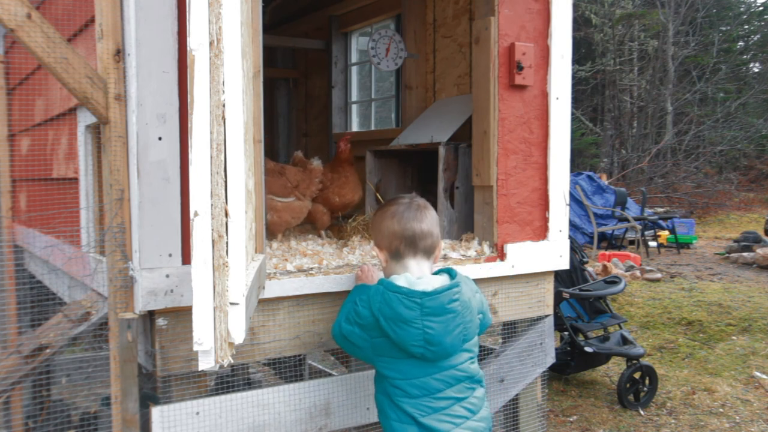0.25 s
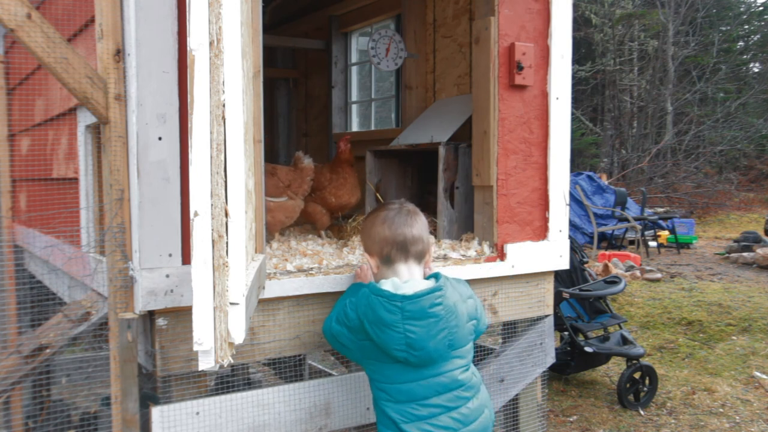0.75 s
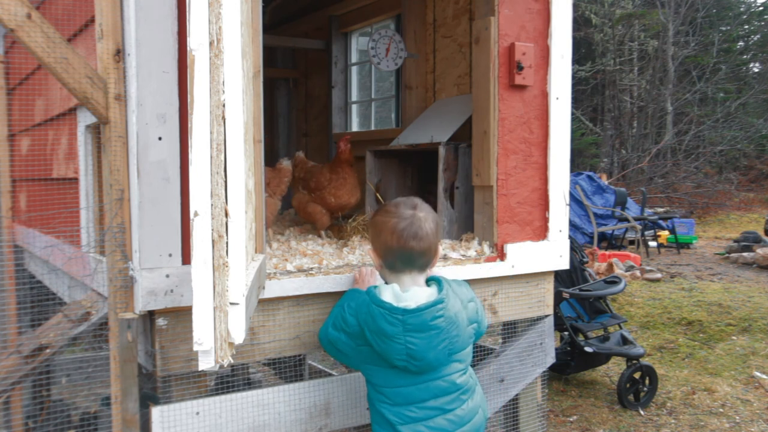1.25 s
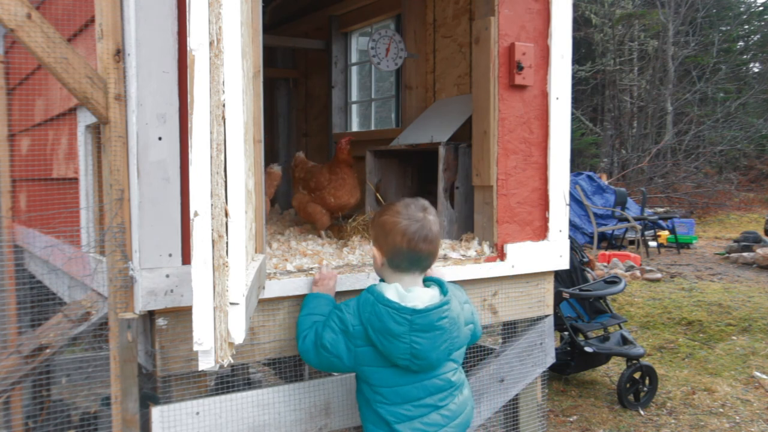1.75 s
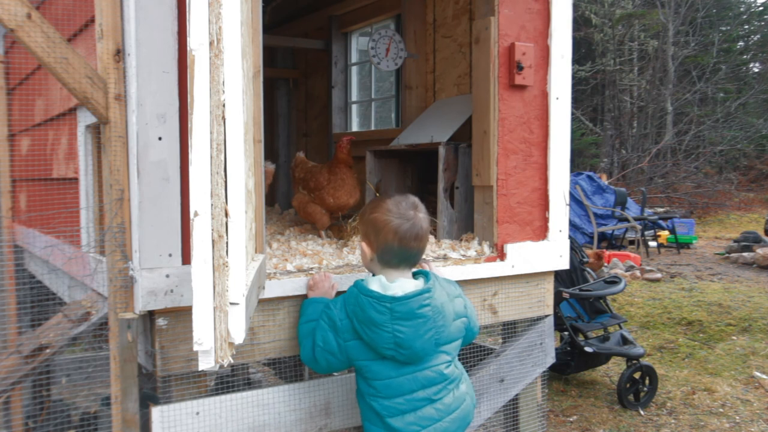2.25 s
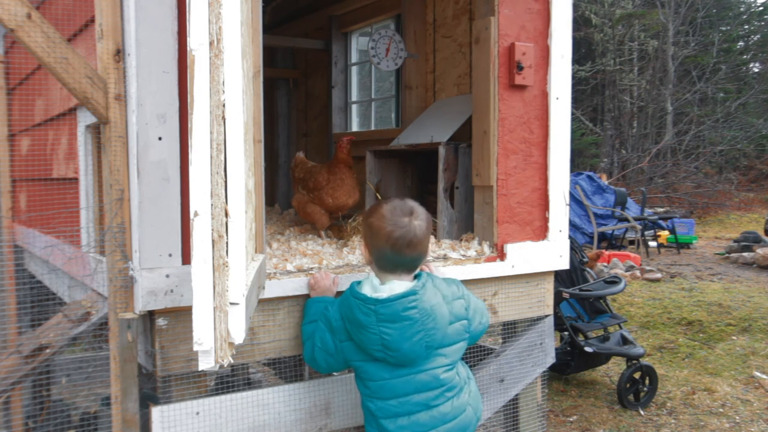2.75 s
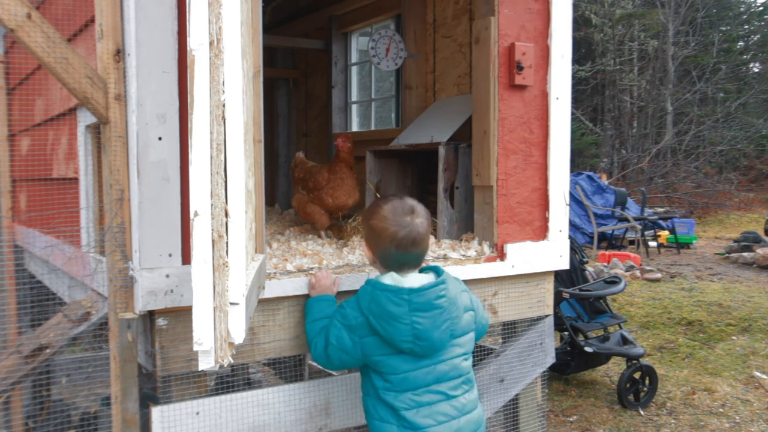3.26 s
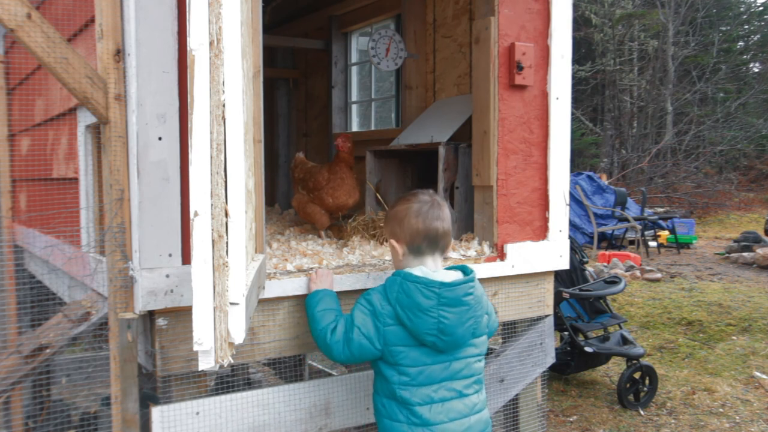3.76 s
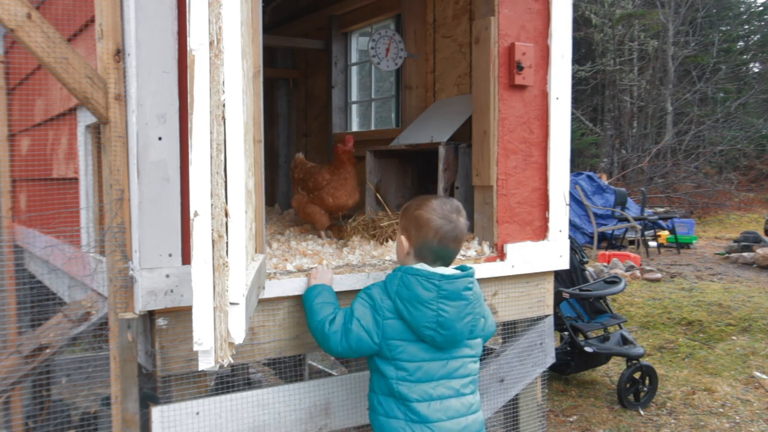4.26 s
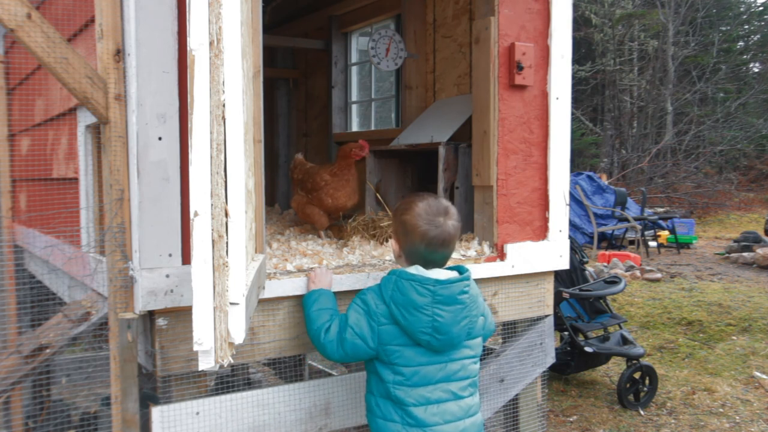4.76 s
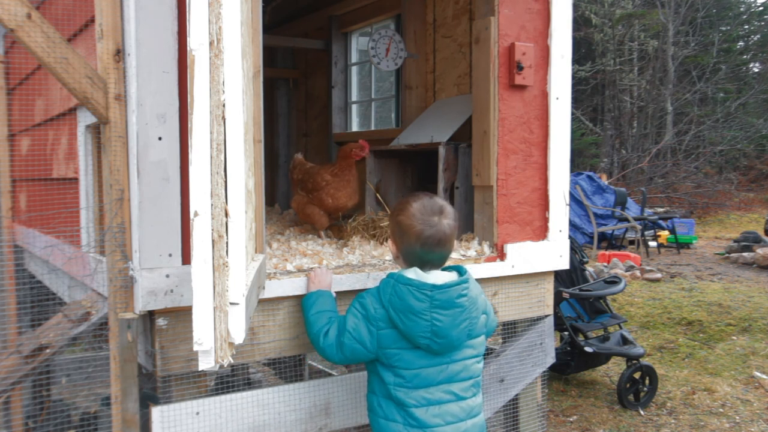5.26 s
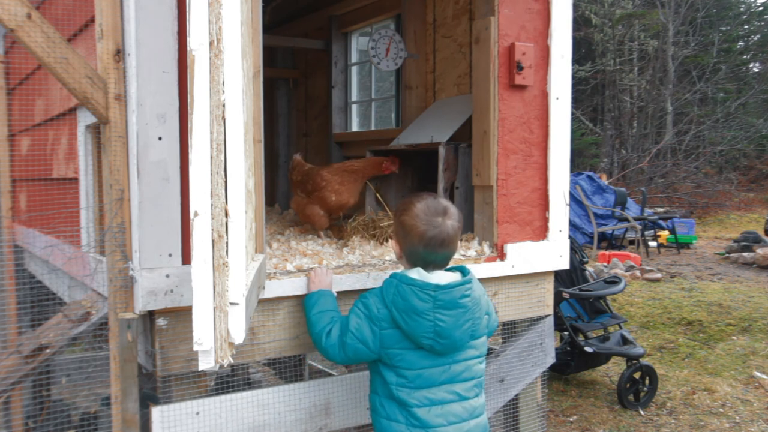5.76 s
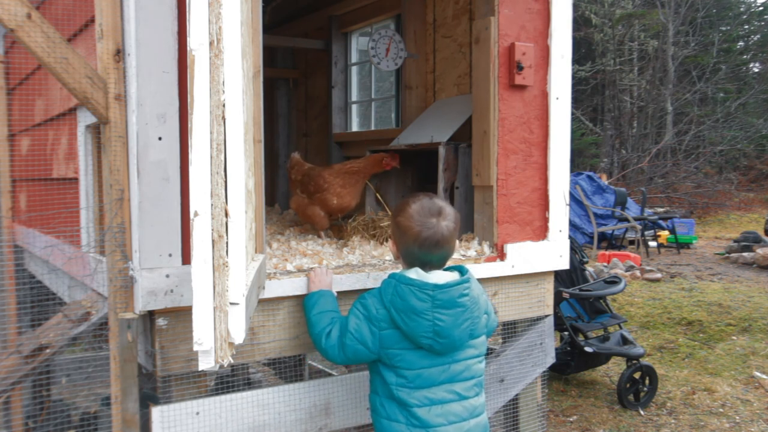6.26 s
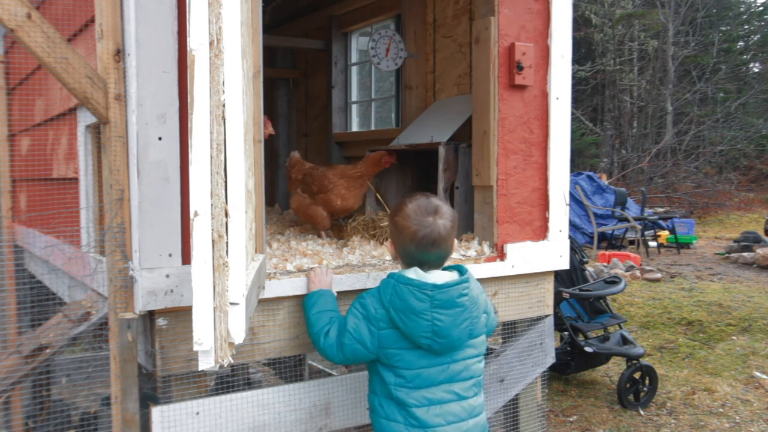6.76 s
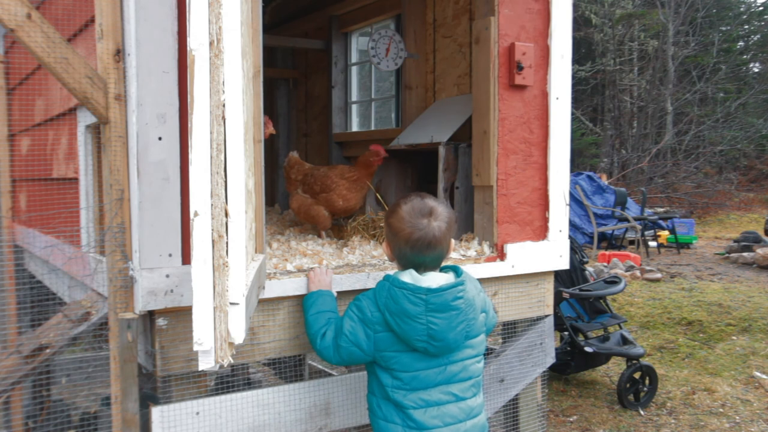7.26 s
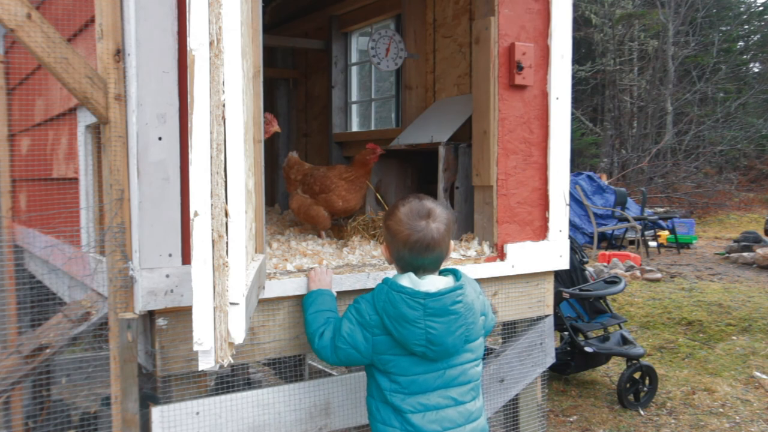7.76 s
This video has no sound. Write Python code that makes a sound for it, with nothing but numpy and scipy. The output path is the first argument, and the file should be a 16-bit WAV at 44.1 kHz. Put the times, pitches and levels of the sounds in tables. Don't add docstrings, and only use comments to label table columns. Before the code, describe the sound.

Contented clucking, rough squawks and low grumbles from hens in a backyard coop, claws scuffling litter on boards, faint wind and trees behind.

```python
import sys
import numpy as np
from scipy import signal
from scipy.fft import rfft, irfft
from scipy.io import wavfile
from scipy.ndimage import uniform_filter1d, minimum_filter1d

SR = 44100
rng = np.random.default_rng(int(sys.argv[2]) if len(sys.argv) > 2 else 0)


def to_linear_factor(level_db):
    exponent = np.asarray(level_db, float) / 20
    return 10 ** exponent


def wav_out(sig):
    wavfile.write(sys.argv[1], SR, np.round(np.clip(np.atleast_2d(sig).T, -1, 1) * 32767).astype(np.int16))


N = 353241
GATE_DEPTH_DB = 9.5

# resonance_hz, width_hz, level_db
SHUT_THROAT = [(480, 390, -14.5), (982, 445, 3.5), (1330, 480, -8), (1842, 258, 4.5), (2780, 600, -6.5),
               (4080, 950, -14.5), (7600, 10000, -38), (14000, 2400, -40.5)]
OPEN_THROAT = [(687, 316, -4), (1028, 320, 3.5), (1273, 296, 4), (2195, 520, -6), (3855, 970, -16),
               (5620, 1010, -19), (7740, 1020, -21.5), (9930, 1600, -30), (12360, 1900, -30.5),
               (15700, 2100, -38.5)]


def resonate(x, modes):
    out = 0
    for k, (hz, width_hz, db) in enumerate(modes):
        pole = signal.tf2sos(*signal.iirpeak(hz, hz / width_hz, SR))
        out = out + (-1) ** k * to_linear_factor(db) * signal.sosfilt(np.vstack([pole, pole]), x)
    return out


def coloured(x, curve):
    hz, db = np.transpose(curve)
    bins_hz = np.arange(N // 2 + 1) * SR / N
    gain = to_linear_factor(np.interp(np.log(bins_hz + 1), np.log(hz), db))
    y = irfft(rfft(x) * gain, N)
    return y / y.std()


def wobble(n, hz):
    w = signal.lfilter(*signal.butter(2, hz, fs=SR), rng.standard_normal(n + 2000))[2000:]
    return w / w.std()


def add(track, s, x):
    i = int(s * SR)
    track[i:i + len(x)] += x[:N - i]


def syrinx(hz, rough, half):
    jitter, shimmer, spread, breath = 0.0632, 0.74, .045, .8
    rough, half, n = np.clip(rough, 0, 1), np.clip(half, 0, 1), len(hz)
    phase = np.pi * np.cumsum(hz * (1 + jitter * rough * wobble(n, 260))) / SR
    k = np.arange(1, int(.74 * SR / hz.max()))[:, None]
    lines = np.where(k % 2, half, 1) * np.cos(k * phase - spread * k ** 2)
    pulses = lines.sum(0) * (1 + shimmer * rough * wobble(n, 150))
    hiss = rng.standard_normal(n) * (1 + np.cos(2 * phase)) * np.sqrt(len(k) / 6)
    return np.sqrt(hz / 400) * ((1 - 0.81 * rough) * pulses + breath * rough ** 0.74 * hiss)


def open_beak(t, hz, db, bright, rough, half, throat):
    notch_hz, notch_width_hz = 2825, 290
    voice = signal.lfilter(*signal.iirnotch(notch_hz, notch_hz / notch_width_hz, SR), syrinx(hz, rough, half))
    low, high = resonate(voice, throat[:4]), resonate(voice, throat[4:])
    edge = np.clip(np.minimum(t - t[0], t[-1] - t) / 0.005, 0, 1)
    level = to_linear_factor(db) / np.sqrt(uniform_filter1d(low ** 2, 900))
    return (low + to_linear_factor(bright + 14) * high) * edge * level


def garden_air():
    # frequency_hz, level_db
    air_curve = [(18, -50), (30, -33), (194, 5.5), (1200, 3), (1630, 2.5), (3580, -5), (5310, -6),
                 (7870, -10.5), (8740, -13.5), (10500, -12), (16000, -20)]
    air_db = -58.5
    return coloured(rng.standard_normal(N), air_curve) * to_linear_factor(air_db + GATE_DEPTH_DB + 0.8 * wobble(N, 2.9))


def earlier_squawk():
    # level_db, t60_s, pitch_hz, line_width_hz, haze_between_lines_db
    db, t60, hz, width, haze_db = (-34.5, 1, 327.5, 25.5, -10)
    noise = signal.lfilter([1, -.9], [1], rng.standard_normal(N))
    lines = resonate(noise, [(k * hz, width, 0) for k in range(1, 14)])
    tail = resonate(lines + to_linear_factor(haze_db) * noise, OPEN_THROAT[:5])
    return tail / tail.std() * to_linear_factor(db - 60 * np.arange(N) / SR / t60)


def steps():
    # start_s, peak_db, board_hz, push_s, scratch_db
    footfalls = [(0.413, -40, 200, 0.012, -18), (.85, -36, 540, .008, -18), (.872, -32, 393, .01, -23),
                 (2.971, -24, 500, 0.013, -13), (3.01, -28.5, 303, .015, -20),
                 (3.05, -29.5, 564, 0.013, -18.5), (3.245, -28, 258, 0.0064, -7.5),
                 (4.289, -28, 210, 0.013, -26.5), (4.7, -31, 242, .014, -24),
                 (5.032, -29.5, 480, 0.015, -29), (5.059, -27.5, 235, 0.012, -20.5),
                 (5.337, -22.5, 220, 0.011, -34), (5.44, -24.5, 290, 0.0064, -31),
                 (5.63, -32, 271, 0.023, -35), (6.47, -28.5, 332, 0.0054, -22.5),
                 (6.557, -26, 510, 0.0055, -36), (6.575, -32.5, 177, 0.018, -22),
                 (6.754, -32.5, 310, 0.0022, -22), (7.968, -45, 224, 0.011, -21)]
    # ratio_to_board_pitch, level_db
    board_modes = [(.55, -7), (0.999, 5.5), (1.7, -14.5), (2.6, -9), (4.199, -15.5)]
    damping = 0.43
    out, t = np.zeros(N), np.arange(SR // 4) / SR
    for s, db, hz, push_s, scratch_db in footfalls:
        push = t / push_s * np.exp(-t / push_s)
        modes = [(hz * ratio, damping * hz * ratio, gain_db) for ratio, gain_db in board_modes]
        boards = resonate(rng.standard_normal(len(t)) * push, modes)
        claw = signal.lfilter([1, -1], [1, -.6], rng.standard_normal(len(t))) * np.exp(-t / (1.1 * push_s))
        thump = boards / np.abs(boards).max() + 0.24 * to_linear_factor(scratch_db) * claw
        add(out, s - .4 * push_s, to_linear_factor(db + 1.0) * thump)
    return out


def coo():
    # centre_s, peak_db, width_s
    swells = [
        (1.01, -50, .06),
        (1.11, -34.5, .045),
        (1.235, -34, .048),
    ]
    start_s, length_s, high_hz, low_hz, sink_s = .98, .36, 545, 384, .105
    t = np.arange(0, length_s, 1 / SR)
    hz = low_hz + (high_hz - low_hz) * np.exp(-t / sink_s)
    phase = 2 * np.pi * np.cumsum(hz) / SR
    swell = sum(to_linear_factor(db) * np.exp(-((t + start_s - s) / width) ** 2) for s, db, width in swells)
    out = np.zeros(N)
    add(out, start_s, swell * (np.sin(phase) + to_linear_factor(-35) * np.sin(2 * phase)))
    return out


def cluck_run(rows, throat, length, hoarse, gain_db=-2, scoop=0.2517, half=0.39):
    out = np.zeros(N)
    u = np.arange(int(length * SR)) / (length * SR)
    swell = np.sin(np.pi * u ** 1.594)
    for s, db, hz, open_db in rows:
        pitch = hz / 2 * (1 - scoop * np.exp(-u / 0.1706) - 0.032 * u ** 3)
        voice = syrinx(pitch, hoarse * (1 + 1.95 * np.exp(-u / 0.31)), half * hoarse)
        low = resonate(np.pad(voice * swell ** .9, (0, 600)), throat[:3])
        high = resonate(np.pad(voice * swell ** 1.5, (0, 600)), throat[3:])
        voice = low - to_linear_factor(open_db + 5.5) * high
        add(out, s - 0.33 * length, voice * to_linear_factor(db + gain_db - 8.5) / voice.std())
    return out


def short_clucks():
    # start_s, peak_db, second_partial_hz, beak_opening_db
    rows = [
        (1.005, -10, 1020, -14),
        (1.225, -8.5, 1007, -12),
        (1.443, -8, 1009, -11),
        (1.919, -6, 1020, -15.5),
        (2.864, -11, 981, -15),
        (3.113, -10.5, 947, -11.5),
        (3.606, -9.5, 958.3, -10),
        (3.839, -9.5, 964, -8.5),
        (5.264, -12, 984, -14),
        (5.497, -10, 967.5, -11.5),
    ]
    return cluck_run(rows, SHUT_THROAT, length=.056, hoarse=.21)


def squawk(rows, half):
    treble_db, rough_lift_db, grow_db_per_s, shut_db, shut_s = -17.5, 8, 18, -12, 0.044
    s, *columns = np.transpose(rows)
    t = np.arange(s[0], s[-1], 1 / SR)
    hz, db, rough = (np.interp(t, s, c) for c in columns)
    shut = np.clip(1 - (s[-1] - t) / shut_s, 0, 1)
    bright = treble_db + rough_lift_db * rough + grow_db_per_s * (t - s[0]) + shut_db * shut
    bright = bright + 2.55 * wobble(len(t), 36)
    return open_beak(t, hz, db, bright, rough, half, OPEN_THROAT)


def squawks():
    # time_s, pitch_hz, level_db, roughness (0-1)
    first = [
        (1.572, 371.9, -10.5, 0.38),
        (1.68, 368, -13.5, 0.42),
        (1.695, 332.3, -12.5, .2),
        (1.731, 335.2, -16, 0.4),
        (1.809, 356.8, -25, 0.6),
    ]
    second = [
        (3.953, 300.8, -10, 0.93),
        (3.985, 313.5, -8, 0.077),
        (4.02, 322.3, -12, 0.013),
        (4.05, 318.6, -15.5, 0.35),
        (4.147, 339.3, -11.5, 0.48),
        (4.167, 326.3, -21, 0.72),
        (4.21, 336, -21.5, 0.4),
    ]
    third = [
        (6.09, 267.8, -15, 1),
        (6.122, 317.2, -9.5, .09),
        (6.165, 322.9, -11, 0.0089),
        (6.222, 326.6, -12, .02),
        (6.233, 324.5, -10, 0.6),
        (6.272, 305, -20.5, 1),
    ]
    half_shares = (0.23, 0.19, .02)
    out = np.zeros(N)
    for call, half in zip((first, second, third), half_shares):
        add(out, call[0][0], squawk(call, half))
    return out


def scuffle():
    # time_s, peak_db, rise_db_per_s, fade_db_per_s, dull_knock_share_db
    kick_rows = [(1.98, -38.5, 400, 57, -34), (2.3, -54.5, 190, 246, -4), (2.85, -41, 94, 160, -24),
                 (3.02, -42, 127, 62, 8.5), (3.246, -38, 2998, 63, -4), (4.72, -52.5, 500, 86, -0.5),
                 (4.9, -54, 200, 97, -19), (6.87, -44.5, 496, 86, -3), (7.22, -50, 153, 202, -8),
                 (5.344, -46.5, 3000, 30, 10.5), (5.486, -46, 300, 247, -16), (5.66, -62, 219, 60, 5.5)]
    # frequency_hz, level_db
    litter_curve = [(300, -17.5), (1000, -11), (2000, -4.5), (4000, -8), (7000, -12.5), (11000, -15),
                    (16000, -31.5)]
    knock_curve = [(70, -29), (180, -1), (300, -3.5), (600, 0), (1100, 0.5), (2500, -33.5)]
    grains_per_s, scatter_db, hiss = 700, 3.0, 2.1
    t = np.arange(N) / SR
    kicks = [to_linear_factor(db - np.maximum(rise * (s - t), fade * (t - s))) for s, db, rise, fade, _ in kick_rows]
    grains = (rng.random(N) < grains_per_s / SR) * to_linear_factor(scatter_db * rng.exponential(size=N))
    noise = rng.standard_normal((2, N)) * (signal.lfilter([1], [1, -.985], grains) + hiss)
    knock = sum(kick * to_linear_factor(row[4]) for kick, row in zip(kicks, kick_rows))
    return sum(kicks) * coloured(noise[0], litter_curve) + knock * coloured(noise[1], knock_curve)


def cracked_clucks():
    # start_s, peak_db, second_partial_hz, beak_opening_db
    rows = [
        (2.628, -16, 910, -15),
        (3.356, -14, 914, -12.5),
        (7.116, -14, 941.5, -12.5),
        (7.444, -12, 951.7, -11.5),
        (7.679, -12.5, 944.6, -9),
        (7.917, -10, 962, -9.5),
    ]
    return cluck_run(rows, SHUT_THROAT, length=.052, hoarse=0.3, gain_db=-1.3, half=1.12)


def ticks():
    # start_s, peak_db, centre_hz
    snaps = [(3.246, -27, 7040), (3.249, -24, 1790), (4.805, -34.5, 2700), (4.805, -40, 6420),
             (4.9, -40, 6000), (5.341, -23, 1870), (5.371, -21.5, 1270), (5.38, -30.5, 5100),
             (5.386, -26.5, 2600), (5.42, -28, 4900), (5.439, -28.5, 1970), (5.485, -34, 7500)]
    t60, width = 0.046, 0.27
    out, t = np.zeros(N), np.arange(SR // 20) / SR
    for s, db, hz in snaps:
        snap = resonate(rng.standard_normal(len(t)) * to_linear_factor(-60 * t / t60), [(hz, width * hz, 0)])
        add(out, s, to_linear_factor(db) * snap / np.abs(snap).max())
    return out


def yelp(start, up, back, end, head_hz):
    # resonance_hz, width_hz, level_db
    yelp_throat = [(620, 1500, -21), (1020, 605, 4), (1304, 340, 2.5), (2020, 680, -8), (3316, 270, -6),
                   (3960, 480, -15.5), (5740, 1070, -20), (7500, 760, -24), (11900, 9300, -35.5)]
    start_hz, chest_hz, strain_hz, back_hz, end_hz = 441, 492.2, 507.2, 551.5, 507
    scoop_s, flip_s, loud_db, quiet_db = 0.0245, 0.0089, -11, -31.5
    t = np.arange(start, end, 1 / SR)
    s = start, start + scoop_s, up - flip_s, up + flip_s, back, back + flip_s, end
    hz = np.interp(t, s, (start_hz, chest_hz, strain_hz, .97 * head_hz, head_hz, back_hz, end_hz))
    db = np.interp(t, s, (quiet_db, loud_db - 2, loud_db, loud_db + 2.5, loud_db - .8, loud_db - 0.5, quiet_db + 12))
    bright = np.interp(t, s, (-38.5, -28, -9.5, -21.5, -9.5, -9.5, -29))
    rough = np.interp(t, s, (0.45, 0.2, 0.56, 0.044, 0.052, 0.37, .15))
    return open_beak(t, hz, db, bright, rough, 0.86 * rough, yelp_throat)


def yelps():
    # start_s, flips_up_s, flips_back_s, end_s, head_pitch_hz
    cries = [
        (5.706, 5.749, 5.783, 5.808, 633.2),
        (5.95, 6.008, 6.045, 6.075, 663.3),
    ]
    out = np.zeros(N)
    for cry in cries:
        add(out, cry[0], yelp(*cry))
    return out


def grumbles():
    # start_s, peak_db, second_partial_hz, beak_opening_db
    rows = [
        (6.392, -20, 770, -11.5),
        (6.597, -21, 802, -8.5),
        (6.842, -21.5, 790, -11),
    ]
    # resonance_hz, width_hz, level_db
    low_throat = [(404, 850, -35), (790, 464, 8), (1210, 680, -7.5), (1800, 350, 2.5), (3160, 1300, -19.5),
                  (5600, 4500, -21.5)]
    return cluck_run(rows, low_throat, length=.04, hoarse=0.52, gain_db=1.0, scoop=0.117)


def yard():
    coop_db, coop_t60 = -11, 0.066
    wall_db, wall_s, wall_spread_s = -17.5, 0.05, 0.03
    trees_db, trees_t60 = -20.5, 0.85
    t = np.arange(SR) / SR
    coop = np.exp(-np.log(1000) * t / coop_t60) * (t > .003)
    wall = np.exp(-((t - wall_s) / wall_spread_s) ** 2)
    trees = np.exp(-np.log(1000) * t / trees_t60) * (1 - np.exp(-t / 0.0033))
    out = signal.unit_impulse(SR)
    for shape, db, band_hz in ((coop, coop_db, [150, 9000]), (wall, wall_db, [700, 4000]),
                               (trees, trees_db, [600, 3500])):
        tail = signal.lfilter(*signal.butter(1, band_hz, "band", fs=SR), rng.standard_normal(SR)) * shape
        out = out + to_linear_factor(db) * tail / np.sqrt(np.sum(tail ** 2))
    return out


def scene():
    hens = coo() + short_clucks() + squawks() + cracked_clucks() + yelps() + grumbles()
    floor = steps() + scuffle() + ticks()
    echoed = signal.fftconvolve(hens + floor, yard())[:N]
    return (echoed + earlier_squawk() + garden_air())[None]


def low_pass(x):
    return signal.sosfilt(signal.butter(12, 16460, fs=SR, output="sos"), x)


def record(dry):
    gate_db, knee_db, close_s = -40.5, 19.5, 0.0027
    top, squeeze = 0.38, 0.3
    x = np.tanh(.8 * dry) / .8
    x = signal.sosfilt(signal.butter(3, 110, "high", fs=SR, output="sos"), x)
    heard_db = 10 * np.log10(uniform_filter1d(x ** 2, int(0.0082 * SR)) + 1e-12)
    opening = np.clip(0.5 + (heard_db - gate_db) / knee_db, 0, 1)
    fall = np.exp(-1 / (close_s * SR))
    opening = np.maximum(opening, signal.lfilter([1 - fall], [1, -fall], opening))
    x = x * to_linear_factor(GATE_DEPTH_DB * (opening - 1))
    peak = uniform_filter1d(-minimum_filter1d(-np.abs(x), size=500), size=500)
    return low_pass(x * np.minimum(1, top / peak) ** squeeze)


dry = scene()
out = record(dry)
wav_out(out)
```